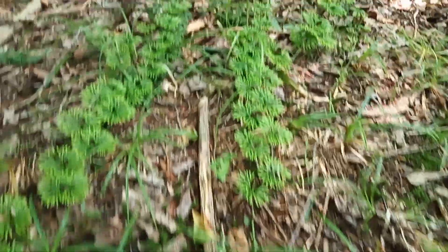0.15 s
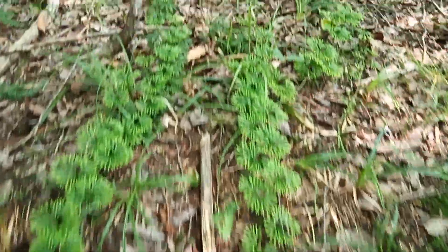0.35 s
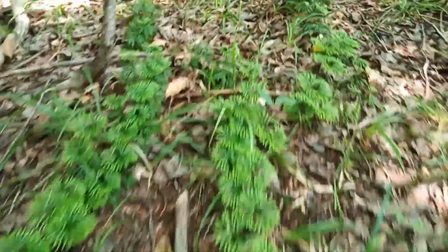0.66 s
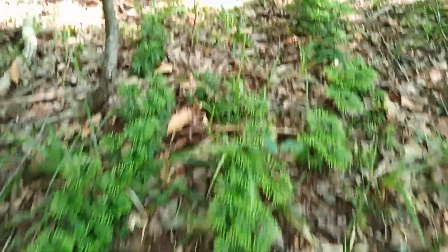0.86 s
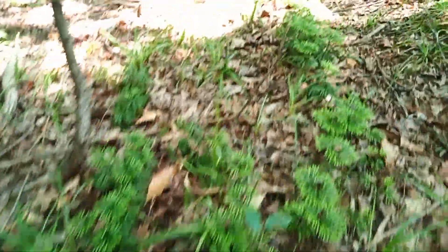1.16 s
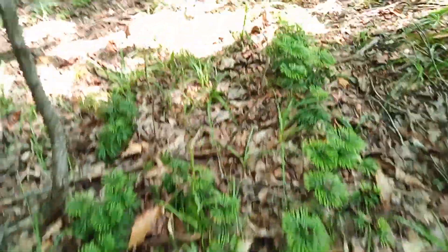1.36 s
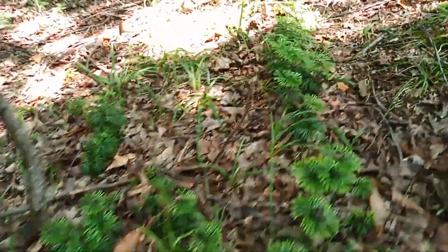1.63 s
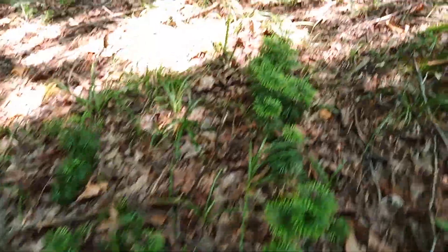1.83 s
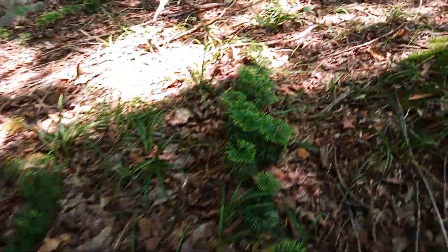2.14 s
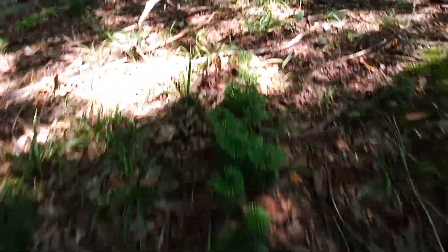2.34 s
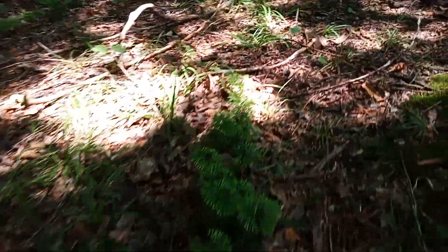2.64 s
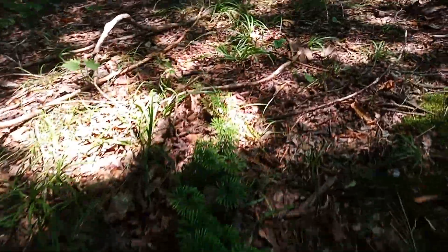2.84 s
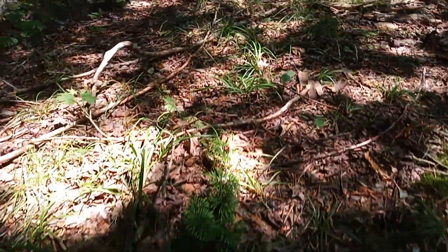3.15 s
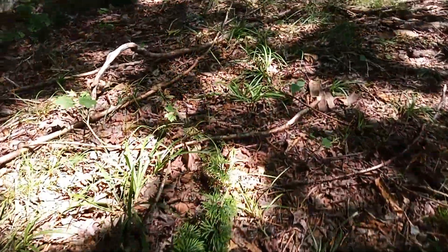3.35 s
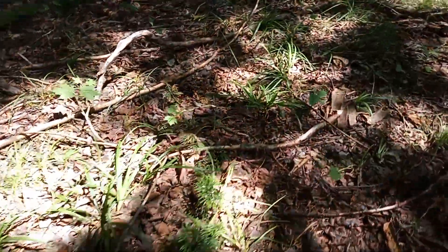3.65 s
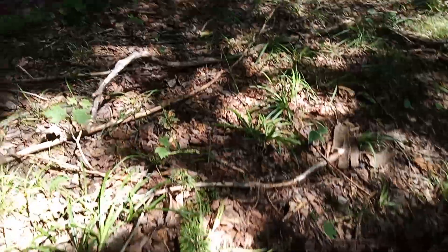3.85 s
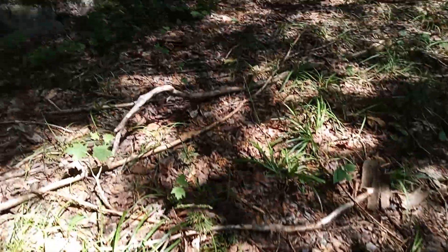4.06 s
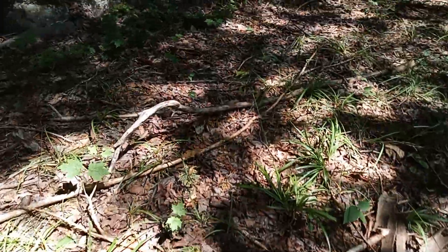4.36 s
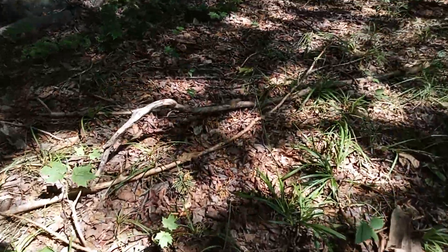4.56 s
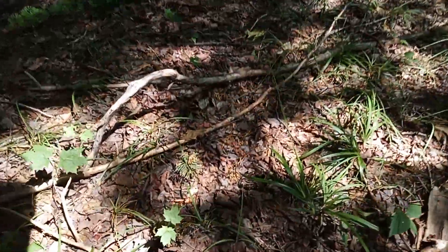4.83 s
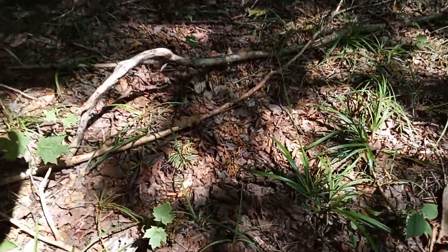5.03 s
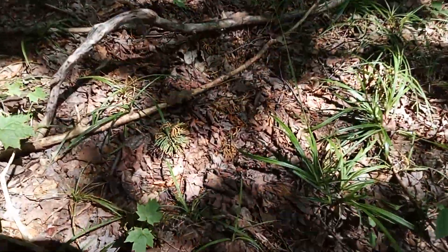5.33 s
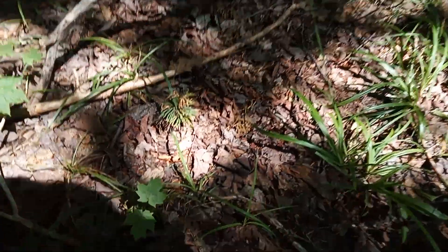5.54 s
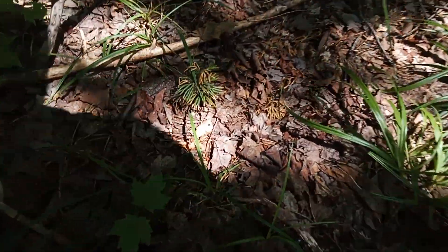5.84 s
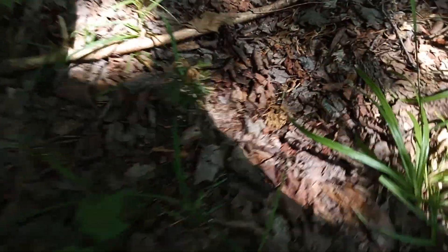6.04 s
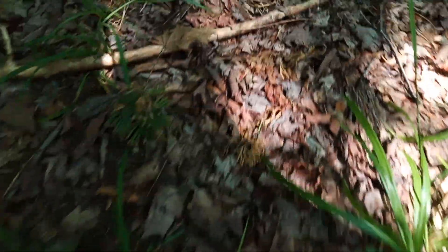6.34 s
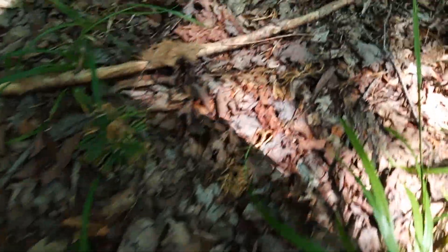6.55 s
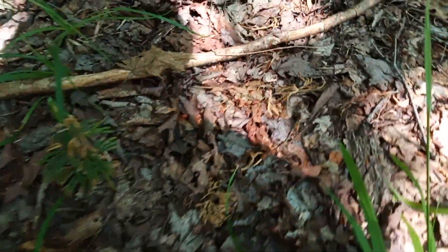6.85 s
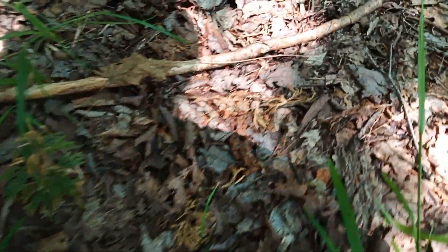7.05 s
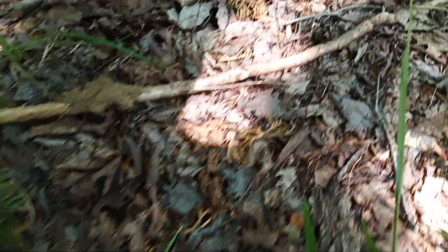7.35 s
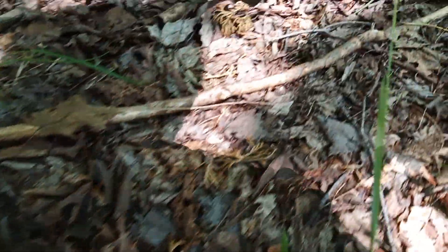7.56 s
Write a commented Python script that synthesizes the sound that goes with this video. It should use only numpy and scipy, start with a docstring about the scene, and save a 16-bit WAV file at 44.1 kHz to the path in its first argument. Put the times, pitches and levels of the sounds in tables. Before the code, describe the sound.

Brittle leaves and twigs crackle underfoot on a quiet forest floor. A brief loud crunch comes early, then near quiet, then a thick run of crisp crunching and bright snaps. Soft low bumps come from the hand gripping the microphone. Later steps are lighter and scattered, with one thin tick, faint high whines and steady muted air.

```python
"""Leaf litter crackles and rustles under slow steps, close to a small hand-held microphone: clumps of tiny
ringing grains over a rubbing hiss, from low twigs to high crumbs, with twigs snapping as noise cracks with rings.
The grip rumbles as filtered noise and thumps the housing in short low sines. Thin high tones whine now and then,
and a faint four-partial hum wavers under still woodland air made of shaped noise."""
import sys
import numpy as np
from scipy import signal
from scipy.fft import rfft, irfft, next_fast_len
from scipy.io import wavfile
from scipy.ndimage import uniform_filter1d, map_coordinates

SR = 44100
rng = np.random.default_rng(int(sys.argv[2]) if len(sys.argv) > 2 else 0)


def generate_wav(sig):
    """Save sig (samples, or channels by samples) to the path in sys.argv[1] as 16-bit PCM at SR."""
    pcm = np.round(np.clip(np.atleast_2d(sig).T, -1, 1) * 32767).astype(np.int16)
    wavfile.write(sys.argv[1], SR, pcm)


N = 339129  # samples

# Presses or drags of the foot: peak t/s, rise/s and fall/s (20 dB each), twigs level/dB, big leaves level/dB,
# big leaves f/Hz, small leaves level/dB, flakes level/dB, crumbs level/dB
PRESSES = [(0.0, .02, 0.052, -69, -51.5, 3920, -52.5, -57.5, -64),
           (0.151, .04, .05, -79, -61.5, 3900, -57.5, -67, -74),
           (0.466, .03, .03, -58.5, -64.5, 2500, -62, -71, -66),
           (0.6, 0.09, 0.095, -92.5, -73, 4600, -75.5, -97, -92),
           (0.698, 0.01, .08, -59.5, -39, 3020, -53, -53, -56.5),
           (0.738, 0.037, .06, -49, -36.5, 3360, -43, -51, -51.5),
           (0.8, .06, .12, -67.5, -55.5, 3000, -57.5, -70, -67.5),
           (0.87, .1, 0.17, -80, -57, 3200, -65.5, -76.5, -78),
           (0.968, 0.017, .15, -86.5, -62, 3500, -88, -84.5, -85),
           (1.04, .2, .04, -84, -61, 3500, -89, -73.5, -84),
           (1.292, .1, 0.071, -75, -67.5, 3430, -70.5, -74, -75.5),
           (1.611, 0.35, .2, -77, -72.5, 2730, -71.5, -78, -83),
           (1.8, .2, 0.27, -84.5, -75.5, 3640, -71, -90, -87.5),
           (2.185, .1, 0.08, -71.5, -59.5, 4260, -57, -69, -64),
           (2.336, 0.073, .13, -59, -46.5, 3940, -46.5, -62.5, -54),
           (2.493, 0.06, .2, -59, -46, 3680, -52, -70.5, -58.5),
           (2.56, .1, .1, -58.5, -55, 4000, -52.5, -69, -62),
           (2.716, .1, 0.14, -64.5, -43, 4350, -43, -54.5, -50),
           (2.823, 0.16, .1, -79, -51.5, 4300, -48, -66, -61),
           (2.907, .05, .05, -70, -45, 4200, -47.5, -55, -53.5),
           (3.06, .15, 0.18, -77, -73, 3930, -62, -77.5, -76.5),
           (3.24, .015, 0.092, -56.5, -42, 4200, -53, -55.5, -58),
           (3.289, 0.055, 0.15, -59.5, -52, 3850, -58, -62, -61),
           (3.52, .2, .4, -79, -57, 4800, -59.5, -65.5, -64.5),
           (3.714, .3, .045, -70, -56, 3700, -57.5, -72, -68.5),
           (3.79, 0.012, .25, -91, -55, 3700, -62, -69.5, -69.5),
           (3.872, 0.12, 0.096, -84, -59, 4260, -65.5, -65.5, -70.5),
           (3.981, 0.063, .03, -78, -55.5, 4500, -57.5, -61, -66.5),
           (4.043, .05, 0.065, -82, -56.5, 3900, -66.5, -63, -69),
           (4.24, .3, 0.24, -79, -66, 4300, -62, -70, -74.5),
           (4.477, .15, 0.33, -71, -59.5, 4200, -63.5, -70.5, -68.5),
           (4.603, 0.22, 0.27, -66, -62.5, 4380, -64.5, -61, -72),
           (4.849, .2, .4, -75.5, -68.5, 4180, -58, -71.5, -73.5),
           (5.014, .3, .25, -75.5, -71.5, 4100, -60.5, -82.5, -75.5),
           (5.375, 0.23, .2, -79.5, -72.5, 3660, -69.5, -78, -77),
           (5.617, .045, 0.054, -64.5, -48.5, 4220, -48.5, -53, -56),
           (5.65, 0.056, .08, -69.5, -58, 3900, -59, -77.5, -70.5),
           (5.75, 0.083, 0.064, -83.5, -65.5, 2700, -67.5, -79, -82),
           (5.819, .08, 0.088, -68, -55, 4700, -55, -75, -83),
           (5.909, .03, 0.065, -70, -58, 2700, -70.5, -76, -80),
           (5.996, .03, 0.072, -85, -72, 4970, -54.5, -77.5, -72),
           (6.102, 0.052, 0.08, -78, -63.5, 4970, -54.5, -67, -73),
           (6.176, 0.037, 0.036, -67, -64, 4190, -73, -81, -69.5),
           (6.401, 0.11, 0.092, -79, -73, 3530, -66.5, -78.5, -77),
           (6.487, 0.046, .04, -66.5, -72.5, 3360, -63, -77.5, -80),
           (6.927, 0.054, .1, -82.5, -73.5, 3570, -70, -76.5, -72),
           (7.037, .04, 0.13, -79, -73.5, 3300, -69, -77.5, -71.5),
           (7.583, .08, .08, -83, -75.5, 4180, -69, -78, -81),
           (7.688, .1, 0.12, -84, -72, 4240, -66, -72, -79)]
# Faint stir between presses: t/s, big leaves level/dB
STIR = [(0, -84.5), (1.1, -83.5), (1.9, -78.5), (3.1, -74), (3.4, -73), (5.1, -74.5), (5.7, -75),
        (6.3, -87), (7, -84.5), (7.3, -79.5), (7.69, -83.5)]
# Stir of twigs, big leaves, small leaves, flakes, crumbs: level/dB relative to the big leaves
STIR_MIX_DB = [-5.5, 0, 4.5, -8, -7]
# Colour of breaking litter through the microphone port: f/Hz, level/dB per Hz
PORT = [(180, -35), (330, -18.5), (480, -14), (923, -19), (1550, -14), (2280, -1), (3770, -6), (4310, -0.5),
        (5460, -6), (7260, 0), (8870, -15), (9980, -6), (13500, -16.5), (15400, -2), (16500, -19.5)]
# Single breaks: t/s, peak level/dB, first ring f/Hz, second ring f/Hz, second ring level/dB relative to the first,
# the crack's dull, crisp and fizzy level/dB, t60/s of the main decay
SNAPS = [(0.176, -54, 4400, 6900, -2, -10, -16, -27, 0.0086),
         (0.234, -50, 4540.0, 2540.0, -9, -23, 6, -21, 0.008),
         (0.3595, -46.5, 12400, 6200.0, 1, 0, -11, -8, 0.011),
         (0.3695, -48, 6770, 4030.0, -15, -11, -15, -25, 0.0057),
         (0.4588, -24, 11600, 2200, -6, -17, -28, -4, 0.0027),
         (0.468, -38, 2040, 14600, -5, -7, -6, -11, 0.0042),
         (0.5299, -30, 6530, 4500.0, -14, -33, -3, -15, 0.0056),
         (0.693, -29.5, 3790.0, 2350.0, 1, -24, -5, -17, 0.0067),
         (0.7168, -27, 4460.0, 2480.0, -5, -12, -3, -17, 0.008),
         (0.7231, -16.5, 2510, 5260, -0.5, -31, 2, -21, 0.017),
         (0.7298, -16.5, 3330, 5580.0, -5, -26, -1, -21, 0.0027),
         (0.7378, -16, 3520, 2000, -18, -26, -7, -32, 0.006),
         (0.7483, -19.5, 6240, 2650.0, -4, -15, 1, -12, 0.004),
         (0.7544, -33, 2500, 4610.0, 0, -15, -6, -20, 0.008),
         (0.7854, -41, 3210.0, 5170.0, -1, -13, -3, -10, 0.008),
         (0.8146, -26.5, 3400, 14730.0, -13, -30, -3, -32, 0.0025),
         (0.8236, -38, 3730.0, 7100, -6, -28, -6, -14, 0.008),
         (0.8375, -39, 7390.0, 4220, 2, -21, -1, -23, 0.008),
         (0.9152, -41, 2370, 4360, -1, -24, -16, -32, 0.008),
         (1.0215, -39, 3280, 2250, -10.5, -30, -24, -17, 0.0083),
         (1.0428, -47, 3600.0, 2520.0, -6, -22, -22, -32, 0.01),
         (1.153, -52.5, 7000, 4760.0, -14, -21, -13, -19, 0.008),
         (1.2698, -51, 7320.0, 15050.0, -8, -23, -15, -18, 0.008),
         (1.2922, -41, 10100, 3290.0, -4.5, -17.5, -6, -13.5, 0.0086),
         (1.3019, -48, 3300, 10080.0, -11, -22, -12, -21, 0.008),
         (1.5703, -51, 2410.0, 4610.0, -6.5, -20.5, -13.5, -25.5, 0.0089),
         (1.606, -43, 6480, 2540.0, -10, -27, -10, -33, 0.0095),
         (1.7464, -49, 5940.0, 3980, -21, -24, -11.5, -23, 0.008),
         (2.1462, -30, 7290, 3920.0, -14, -29, -27, -29, 0.0047),
         (2.1532, -37.5, 6480.0, 4110.0, -15, -29, -22, -30, 0.008),
         (2.1829, -38.5, 15600, 4700, -1, -18, -10, -11, 0.008),
         (2.2685, -49, 7300, 4030.0, -4, -26, -6, -18, 0.0092),
         (2.3036, -42, 4610.0, 15500.0, -1, -21, 0, -7, 0.008),
         (2.3134, -31, 7200, 4290.0, -9, -21, -6, -9, 0.008),
         (2.3277, -35, 6800.0, 4600, -6, -25, -4, -11, 0.008),
         (2.336, -27.5, 7300, 15500, -1, -18, -10, -8, 0.008),
         (2.3481, -33, 7140, 2970.0, -10, -19, -5, -18, 0.0069),
         (2.3535, -36, 7340.0, 4930.0, -6, -11, -6, -17, 0.008),
         (2.387, -31, 4150, 2970, -7, -26, -6, -19, 0.008),
         (2.4205, -34.5, 7320.0, 3750.0, -4, -20, -3, -14, 0.008),
         (2.4716, -26, 6720.0, 2650.0, -17, -17, -5, -19, 0.008),
         (2.4805, -35.5, 2070, 3470.0, -5, -9, -4, -14, 0.008),
         (2.4906, -37, 15200.0, 4970.0, 0, -3, -5, -14, 0.008),
         (2.5032, -30, 4250, 7300, -3, -18, 2, -14, 0.008),
         (2.5101, -29, 4200, 15090.0, -6, -19, 6, -23, 0.008),
         (2.5255, -31, 3320.0, 7080.0, 3, -9, 7, -17, 0.008),
         (2.5378, -37, 4390.0, 2390.0, -3, -1, -2, -17, 0.008),
         (2.5531, -37, 4310.0, 7260.0, -2, -20, 3, -17, 0.008),
         (2.5627, -38, 4330, 6240.0, -2, -23, -7, -24, 0.0086),
         (2.5851, -36, 15120.0, 5400, -1, -15, -4, -10, 0.008),
         (2.593, -27, 7530, 4550, -3, -28, 6.5, -14.5, 0.0059),
         (2.617, -20, 7110.0, 4870.0, -5, -27, 9.5, -5.5, 0.0089),
         (2.6234, -35, 6070.0, 2970.0, -6, -22, -5, -8, 0.008),
         (2.6465, -39, 6550.0, 2410, -4, -19, 0, -22, 0.008),
         (2.6677, -33, 4350.0, 15460.0, 0, -24, -7, -15, 0.008),
         (2.6806, -32, 5750.0, 3960.0, -3, -21, 0, -10, 0.009),
         (2.6861, -27.5, 4560, 6840, -9, -27, -7, -16, 0.0094),
         (2.7006, -31, 4780.0, 7060.0, -5, -21, 1, -16, 0.0066),
         (2.7077, -21, 4350.0, 15200, -6, -45, -1, -9, 0.008),
         (2.7129, -29, 6370.0, 4000, -12, -35, -15, -19, 0.0063),
         (2.7245, -29, 7240.0, 4370.0, 0, -25, 0, -15, 0.0068),
         (2.7328, -27.5, 6570.0, 9450, -2, -34, -3, -11, 0.008),
         (2.7476, -35, 6200.0, 4030.0, -6, -23, -2, -19, 0.0058),
         (2.7696, -32, 7150.0, 14710.0, -1, -18, -2, -2, 0.008),
         (2.7975, -30.5, 4230, 7640, -1, -34, -2, -11, 0.0089),
         (2.8058, -32, 7200, 4260.0, -2, -45, -12, -23, 0.0072),
         (2.8149, -25.5, 6460, 4200, -4, -47, -27, -33, 0.008),
         (2.8273, -30, 4650, 6850.0, 0, -34, 1, -28, 0.0062),
         (2.8353, -39, 4110.0, 6270.0, -1, -30, -7, -23, 0.008),
         (2.8978, -13, 7030, 15240, -3.5, -49, -1, -9, 0.011),
         (2.9127, -30, 4720.0, 6700.0, -2, -27, 4, -17, 0.0072),
         (2.9825, -46, 7100, 4480.0, -11, -24, -16, -26, 0.008),
         (2.9931, -39.5, 6450, 4460.0, -19, -37, -27, -35, 0.0047),
         (3.2194, -38.5, 2610.0, 10850.0, 7, -27, 2, -4, 0.0099),
         (3.2323, -25, 5000, 2710.0, -6.5, -28, 3, -42, 0.023),
         (3.2424, -28, 4840, 2820, -11, -28, -8, -14, 0.008),
         (3.2519, -30.5, 3970, 6270.0, -5, -0.5, -30, -24, 0.0097),
         (3.2595, -38, 4050.0, 7240.0, 0, -17, -2, -11, 0.008),
         (3.2666, -38, 15610.0, 6180.0, -3, -22, -5, -14, 0.008),
         (3.3335, -47, 5430.0, 3570.0, -6, -18, 1, -11, 0.008),
         (3.3718, -43, 7110.0, 2880, -9, -25, -10, -14, 0.008),
         (3.5166, -46, 5100, 10550.0, -4, -22, -8, -21, 0.007),
         (3.5263, -45, 10600, 14990.0, -5, -25, -15, -20, 0.0086),
         (3.5873, -43, 7050, 4030.0, -6, -21, 2, -21, 0.008),
         (3.651, -36.5, 6260, 4050.0, -14, -27, -9, -27, 0.008),
         (3.6652, -40.5, 6800.0, 15070.0, -8, -28, -4, -16, 0.0043),
         (3.7017, -39, 6220.0, 3620.0, 5, -19, -11, -15, 0.008),
         (3.8266, -54, 7060.0, 4110.0, -5, -19, -3, -20, 0.008),
         (3.8388, -36.5, 10900, 4650.0, -12, -36, -10, -30, 0.012),
         (3.858, -47, 4650.0, 6700, 0, -29, -6, -21, 0.008),
         (3.8729, -42, 4540.0, 2730.0, -8, -18, 1, -21, 0.0092),
         (3.9576, -34.5, 7280.0, 3850.0, -24, -28, -21, -33, 0.0068),
         (3.9743, -34, 5230.0, 11200, -3, -24, 0, -20, 0.0094),
         (3.9918, -32, 10920, 4550, -2, -42, 4, -10, 0.008),
         (4.0291, -38, 3940.0, 5700, -2, -27, -3, -5, 0.008),
         (4.0474, -40.5, 2700, 5400.0, -4, -25, -1, -15, 0.008),
         (4.0735, -48, 15500.0, 7560.0, 1, -12, -10, -13, 0.008),
         (4.1368, -48, 6800, 4160.0, -7, -15, -10, -14, 0.008),
         (4.1564, -39, 4740, 7120, -6, -24, 11, -14, 0.013),
         (4.206, -43.5, 7200, 4110.0, -16, -30, -13.5, -27, 0.007),
         (4.2307, -46, 7300, 4030.0, -17, -29, -20, -27, 0.0065),
         (4.2599, -32, 7300, 10300, -20, -34, -31, -35, 0.0036),
         (4.4641, -35, 9690.0, 4140, -13, -22, -12, -7, 0.008),
         (4.4723, -39, 1920, 15500, -11, -12, -14, -28, 0.011),
         (4.4897, -32.5, 4590.0, 7300.0, -2, -20, -10, -7, 0.0071),
         (4.5097, -36.5, 9540, 3980.0, -4, -25, -5, -13, 0.012),
         (4.5835, -43, 8180.0, 2150.0, -8, -15, -7, -21, 0.0069),
         (4.5993, -40, 10250.0, 5150.0, -3, -19, -11, -20, 0.0073),
         (4.6136, -44, 10830.0, 4240.0, -6, -15, -10, -18, 0.008),
         (4.6646, -46, 4410.0, 7000, -3, -11, 0, -24, 0.0074),
         (4.7149, -50, 6850.0, 10510.0, -5, -2, -8, -15, 0.008),
         (4.8402, -40, 7260, 4160.0, -16, -30, -16, -26, 0.0052),
         (4.846, -45, 7240.0, 4500.0, -13, -24, -8, -26, 0.0067),
         (4.8799, -49, 6570.0, 15550.0, -17, -28, -16, -30, 0.0073),
         (4.9317, -42, 7300, 5040.0, -11, -26, -18, -15, 0.0099),
         (5.0209, -46, 6800, 4100, -13, -23, -14, -30, 0.0065),
         (5.3756, -47, 2230, 6720.0, -1, -1, -2, -8, 0.0073),
         (5.567, -49.5, 400, 740, -15, -13, -34, -34, 0.037),
         (5.6056, -33, 7540, 14880.0, -1, -32, -14, -7, 0.008),
         (5.6133, -35, 15460.0, 7240.0, -6, -24, -5, -10, 0.008),
         (5.6313, -31, 6030, 8590.0, 1, -16, 4, -22, 0.0078),
         (5.714, -45, 6700, 4110.0, -15, -35, -17, -20, 0.0052),
         (5.7639, -45, 2670.0, 6290.0, -9, -31, -11, -20, 0.008),
         (5.7899, -35, 5900, 4220, -9, -33, -3, -38, 0.0057),
         (5.8015, -42, 5900, 4090.0, -7, -21, -3, -32, 0.008),
         (5.8203, -36, 4310, 7700, -11, -40, 5, -29, 0.008),
         (5.9022, -35.5, 1240, 2710.0, -2, -5, 3, -11, 0.008),
         (5.9086, -44.5, 2550, 1380.0, 0, -3, -3, -31, 0.008),
         (5.9475, -48, 2500.0, 6400.0, -4, -17, -14, -10, 0.008),
         (5.9962, -40, 7100, 4310.0, -15, -34, -20, -17, 0.0063),
         (6.0687, -20.5, 15120.0, 9990.0, -1.5, -49, -33, -10, 0.0046),
         (6.1057, -41, 6040, 9150.0, -11, -35, -14, -30, 0.0085),
         (6.138, -51, 6550.0, 2950.0, -2, -12, -3, -23, 0.0077),
         (6.1657, -36, 1390, 4280, -1.5, -5, -14, -11, 0.011),
         (6.1793, -46, 4500, 1460.0, -12, -7, -15, -24, 0.008),
         (6.2409, -32.5, 2620, 6090.0, 1, -2, 2, -14, 0.0052),
         (6.2682, -48, 10270.0, 7240.0, -5.5, -23, -5, -21, 0.008),
         (6.3857, -49, 6870, 2380, -8, -12.5, -3, -28, 0.0073),
         (6.4114, -48, 2290, 6330.0, -6, -8, -7, -22, 0.0067),
         (6.4732, -49, 6550, 15270.0, -15, -16, -15, -21, 0.008),
         (6.4812, -32.5, 2370, 1090, -15, -4, -8, -19, 0.008),
         (6.4893, -47, 1320, 1870.0, -6, -5, -17, -32, 0.0092),
         (6.5025, -47, 6930, 4760, -8, -19.5, -15, -29, 0.008),
         (6.9246, -46, 6430, 15630, -6.5, -26, -17, -18, 0.008),
         (6.931, -47, 6400.0, 15610.0, -7, -20, -18, -19, 0.008),
         (7.0266, -46, 6600, 15400.0, -10, -25, -20.5, -21, 0.015),
         (7.033, -43, 6900, 10900, -13, -27, -19, -22, 0.008),
         (7.0392, -43.5, 10700, 6870, -3, -26, -14, -22, 0.01),
         (7.3423, -54, 7020.0, 4080, -1.5, -22, -0.5, -23, 0.0074),
         (7.5797, -48.5, 7200, 4570.0, -4, -18, -1.5, -17, 0.008),
         (7.6499, -50, 7040.0, 10140, -10, -20, -13, -21, 0.008)]
# Where a crack is dull, crisp, fizzy: f/Hz
CRACK_HZ = [1000, 4700, 13000]
# Lesser breaks: median peak over the litter's gain and its spread, crack colour at CRACK_HZ, main decay
LESSER_DB, LESSER_SPREAD_DB, LESSER_CRACK_DB, LESSER_T60_S = 5, 2.5, [-22, -7, -16.5], 0.0073
CROWDING = 0.35  # power of the litter's gain that draws lesser breaks into loud presses
# Colour of the grip rumble through the housing: f/Hz, level/dB per Hz
HOUSING = [(15, -45.5), (25, -35), (54, 8.5), (98, 10.5), (123, 6), (194, -9), (300, -30), (390, -38),
           (660, -120)]
# The hand shifts on the housing: peak t/s, rise/s and fall/s (20 dB each), rumble level/dB
SHIFTS = [(0.0, .1, 0.39, -71), (0.26, 0.075, 0.25, -69), (0.54, 0.044, .09, -66), (0.83, .04, .06, -58),
          (1.03, 0.11, .03, -66), (1.14, 0.057, .25, -72.5), (1.62, 0.07, .1, -57.5), (1.95, .05, .2, -67),
          (2.122, 0.05, .03, -48.5), (2.23, 0.03, 0.28, -58), (2.36, 0.043, 0.14, -41.5),
          (2.57, 0.053, .06, -45.5), (2.76, 0.045, .2, -63), (2.89, 0.083, 0.092, -56),
          (2.99, 0.12, 0.12, -56.5), (3.44, 0.099, 0.34, -62.5), (3.62, 0.087, 0.14, -49),
          (3.83, 0.019, 0.46, -54.5), (4.03, 0.13, 0.11, -56), (4.45, .04, 0.17, -63.5),
          (5.18, .08, .2, -68), (5.55, 0.086, .8, -73), (6.06, 0.54, 0.15, -72), (6.17, 0.16, 0.042, -71.5),
          (7.129, 0.17, .2, -73.5)]
HOLD_DB = -91  # rumble of the steady hold
# Housing knocks: t/s, level/dB before the soft attack, f/Hz, t60/s
THUMPS = [(2.096, -49, 53.8, 0.095), (2.341, -53, 96, 0.114), (2.523, -53, 118, 0.066),
          (2.9, -27.5, 120, 0.052), (2.988, -26.5, 113, 0.04), (3.474, -41.5, 74.4, 0.096),
          (3.592, -45, 77, 0.29), (3.819, -46, 68, 0.37)]
# Thin high whines: t/s, length/s, f/Hz, level/dB, level/dB of the tone a fifth up (levels before the flicker)
WHINES = [(5.123, 0.32, 7530, -69, -99), (7.08, 0.27, 7270, -76, -85.5), (7.33, 0.19, 7090, -75, -80)]
HUM_HZ = 117.6  # centre of the fundamental's wander
# Hum fundamental before the waver: t/s, level/dB
HUM = [(0.0, -85), (0.3, -64), (0.45, -82), (0.86, -66), (0.92, -76), (1.61, -69.5), (1.69, -87),
       (2.27, -63), (2.31, -70), (2.4, -54), (2.63, -61), (3.0, -58), (3.04, -69), (3.41, -72.5),
       (3.64, -64), (3.79, -85), (4.07, -67), (4.11, -75.5), (4.77, -73.5), (6.17, -72.5), (6.34, -86),
       (7.5, -84.5), (7.56, -71.5), (7.69, -77)]
# Hum partials 2, 3, 4 between swells, before the waver: level/dB
PARTIALS_DB = [-90, -87.5, -92]
# A hum partial swells: peak t/s, rise/s and fall/s (20 dB each), partial number, level/dB
PARTIAL_SWELLS = [(1.58, 0.21, 0.085, 3, -79.5), (1.71, .2, .35, 2, -74), (3.72, 0.045, 0.038, 3, -67),
                  (3.88, 0.11, 0.18, 3, -63), (3.9, 0.64, 0.18, 2, -74), (4.33, 0.21, 0.19, 3, -67),
                  (4.35, 0.37, 0.52, 2, -75.5), (4.99, 0.19, 0.36, 3, -81.5), (5.59, 0.19, .3, 3, -82),
                  (6.15, .6, .3, 2, -81)]
# Colour of the background air: f/Hz, level/dB per Hz
AIR = [(18, -32), (30, -17), (135, 9), (350, -4), (409, -8), (467, -7.5), (519, -15), (1270, -19),
       (5590, -15.5), (7090, -11.5), (8760, -43), (10500, -16.5), (13400, -46.5), (15200, -18.5),
       (16500, -39.5)]
AIR_DB = -70  # mean level of the air
TOP_HZ = 15950  # band limit


def rustle():
    """Dense small breaks over a rubbing hiss; the smaller the piece, the higher its grains."""
    (twig, leaf, little, flake, crumb), leaf_hz = litter()

    def near(hz):
        return hz * 2 ** (0.099 * wobble(20))

    twigs = 0.61 * grains(near(752), 0.31, count=3500, cycles=11, spread_db=2.0)
    twigs = twigs + 0.77 * rub(570, 2000)
    leaves = 0.53 * grains(leaf_hz, 0.25, count=6000, cycles=16, spread_db=2.5)
    leaves = leaves + 0.56 * rub(2900, 5500)
    small = 0.77 * grains(near(6980), 0.15, count=8000, cycles=16, spread_db=2.5)
    small = small + 0.48 * rub(5500, 8200)
    flakes = 0.71 * grains(near(10500), 0.1, count=8000, cycles=30, spread_db=4.0)
    flakes = flakes + 0.96 * rub(9000, 17000)
    crumbs = 0.8 * grains(near(14600), 0.06, count=8000, cycles=30, spread_db=2.5)
    crumbs = crumbs + 0.7 * rub(12500, 17000)
    layers = twig * twigs + leaf * leaves + little * small + flake * flakes + crumb * crumbs
    return amp(2.2 * wobble(45)) * layers  # the whole rustle flutters


def litter():
    """Gains of twigs, big leaves, small leaves, flakes, crumbs, and the big leaves' pitch: presses over the stir."""
    power = amp(curves(STIR)[0] + np.array(STIR_MIX_DB)[:, None]) ** 2
    for s, rise, fall, twig_db, leaf_db, _, *fine_db in PRESSES:
        press = np.outer(amp([twig_db, leaf_db, *fine_db]), swell(s, rise, fall))
        power = power + press ** 2
    leaf_hz = curves([(row[0], row[5]) for row in PRESSES])[0]
    return np.sqrt(power), leaf_hz


def grains(centre_hz, octaves, count, cycles, spread_db):
    """Tiny breaks in clumps, sizes uneven: each decays 60 dB in the given cycles, cut after about ten."""
    at, size = rng.random((count, 2)).T
    crowd = np.cumsum(amp(4.5 * wobble(60)))
    start = np.interp(at, crowd / crowd[-1], np.arange(N)).astype(int)
    hz = np.clip(centre_hz[start] * 2 ** (octaves * rng.standard_normal(count)), 300, 15900)
    # a few draws near zero make rare large breaks
    gain = amp(along(PORT, hz) - spread_db * np.log(size + 0.006)) * np.sqrt(hz)
    k = np.arange(int(10 * SR / np.median(hz)))
    turns = np.outer(hz / SR, k)
    envelope = np.exp(-np.log(1000) * turns / cycles) * (1 - np.exp(-turns))
    rings = gain[:, None] * envelope * np.sin(2 * np.pi * turns)
    landing = (start[:, None] + k).ravel()
    return unit(np.bincount(landing, rings.ravel(), minlength=N)[:N])


def rub(lo_hz, hi_hz):
    """The hiss of pieces sliding over each other: band-shaped noise in patches of shifting colour."""
    z = signal.stft(rng.standard_normal(N), nperseg=256)[2]
    patches = uniform_filter1d(rng.standard_normal(z.shape), size=4, axis=0)  # across frequency
    patches = uniform_filter1d(patches, size=8, axis=1)  # across time
    hiss = signal.istft(z * amp(3 * unit(patches)), nperseg=256)[1][:N]

    def band(hz):
        low_cut = 1 + (lo_hz / (hz + 1)) ** 10
        high_cut = 1 + (hz / hi_hz) ** 10
        return amp(along(PORT, hz)) / np.sqrt(low_cut * high_cut)

    return unit(filtered(hiss, band))


def snaps():
    """Each break: a sharp noise crack, two brief rings of the piece, then a weak rattle as it settles."""
    size, rows = 2048, [*SNAPS, *lesser_snaps(count=70)]
    out, t, hz = np.zeros(N + size), np.arange(size) / SR, np.fft.rfftfreq(size, 1 / SR)
    port_level = along(PORT, np.array(CRACK_HZ))
    attack = 1 - np.exp(-t / 0.00033)
    low_cut = np.sqrt(1 + (550 / (hz + 1)) ** 4)
    noises = rng.standard_normal((len(rows), size))
    for (s, db, hz1, hz2, db2, *tone, t60), noise in zip(rows, noises):
        # bend the port's colour to meet the dull, crisp and fizzy levels
        bend = along(list(zip(CRACK_HZ, tone - port_level)), hz)
        colour = amp(along(PORT, hz) + bend) / low_cut
        crack = 1.67 * irfft(rfft(noise) * colour)
        ring = np.sin(2 * np.pi * hz1 * t) + amp(db2) * np.sin(2 * np.pi * hz2 * t)
        decay = amp(-60 * t / t60) + 0.131 * amp(-60 * t / 0.033)  # main break, then rattle
        burst = attack * (crack + ring) * decay
        out[round(s * SR):][:size] += amp(db) * burst / np.abs(burst).max()
    return out[:N]


def lesser_snaps(count):
    """Rows of small breaks at random, crowding where the litter is pressed hardest."""
    gain = np.linalg.norm(litter()[0], axis=0)
    crowd, r = np.cumsum(gain ** CROWDING), rng.standard_normal((count, 8))
    at = np.searchsorted(crowd / crowd[-1], rng.random(count))
    peak_db = 20 * np.log10(gain[at]) + LESSER_DB + LESSER_SPREAD_DB * r[:, 0]
    hz1 = 3900 * 2 ** (0.3 * r[:, 1])
    hz2 = 6900 * 2 ** (0.069 * r[:, 2])
    db2 = 4 + 6 * r[:, 3]
    crack_db = LESSER_CRACK_DB + 5 * r[:, 4:7]
    return np.column_stack([at / SR, peak_db, hz1, hz2, db2, crack_db, np.full(count, LESSER_T60_S)])


def handling():
    """The grip rumbles in lumps of low noise and knocks the housing into short, decaying low sines."""
    rumble = filtered(rng.standard_normal(N), lambda hz: amp(along(HOUSING, hz)))
    lumps = amp(3.1 * wobble(14)) * rumble
    grip = amp(HOLD_DB) + sum(amp(db) * swell(s, rise, fall) for s, rise, fall, db in SHIFTS)
    out, t = grip * unit(lumps), np.arange(SR // 4) / SR
    attack = 1 - np.exp(-t / 0.01)
    for s, db, hz, t60 in THUMPS:
        knock = amp(db - 60 * t / t60) * attack * np.sin(2 * np.pi * hz * t)
        out[round(s * SR):][:len(t)] += knock
    return out


def whines():
    """Thin high tones, unsteady in pitch and level, that fade in and out with a tone a fifth above."""
    out, t = 0, np.arange(N) / SR
    for s, length, hz, db, upper_db in WHINES:
        turn = 2 * np.pi * np.cumsum(hz * (1 + 0.0063 * wobble(90))) / SR
        fade = np.sin(np.pi * np.clip((t - s) / length, 0, 1)) ** 0.51
        shape = fade * amp(4.5 * wobble(35))
        tones = amp(db) * np.sin(turn) + amp(upper_db) * np.sin(3 / 2 * turn)
        out = out + np.sqrt(2) * shape * tones  # root two: levels are rms
    return out


def hum():
    """Four partials of a low tone that drift together in pitch and waver separately in strength."""
    turn = 2 * np.pi * np.cumsum(HUM_HZ + 1.57 * wobble(8.3)) / SR
    gains = [amp(curves(HUM)[0])]
    for partial, rest_db in enumerate(PARTIALS_DB, start=2):
        swells = sum(amp(db) * swell(s, rise, fall)
                     for s, rise, fall, n, db in PARTIAL_SWELLS if n == partial)
        gains.append(amp(rest_db) + swells)
    return sum(np.sqrt(2) * gain * amp(3.6 * wobble(22)) * np.sin(partial * turn)
               for partial, gain in enumerate(gains, start=1))


def air():
    """Far leaves and the microphone's own hiss, as one bed of shaped noise that barely drifts in level."""
    bed = filtered(rng.standard_normal(N), lambda hz: amp(along(AIR, hz)))
    return amp(AIR_DB + 0.4 * wobble(1.3)) * unit(bed)


def swell(s, rise, fall):
    """Gain that climbs to 1 at s and dies away, 20 dB in each given time."""
    t = np.arange(N) / SR - s
    return amp(-20 * np.maximum(-t / rise, t / fall))


def wobble(rate):
    """A smooth random curve, rate knots a second."""
    knots = rng.standard_normal(int(N * rate / SR) + 4)
    return map_coordinates(knots, [np.arange(N) * rate / SR])


def curves(rows):
    """One value per sample for each column after the time."""
    s, *cols = np.transpose(rows)
    return [np.interp(np.arange(N) / SR, s, c) for c in cols]


def along(points, hz):
    """Values at hz, read between (Hz, value) points on a log axis."""
    f, v = np.transpose(points)
    return np.interp(np.log(hz + 1), np.log(f + 1), v)


def filtered(x, response):
    """x with its spectrum multiplied by a response of frequency."""
    m = next_fast_len(N + 8192)
    return irfft(rfft(x, m) * response(np.fft.rfftfreq(m, 1 / SR)), m)[..., :N]


def amp(db):
    """Decibels to gain."""
    return 10 ** (np.asarray(db) / 20)


def unit(x):
    """Scaled to rms 1."""
    return x / np.sqrt(np.mean(x ** 2) + 1e-20)


def scene():
    """All sources, one channel."""
    return (rustle() + snaps() + handling() + hum() + whines() + air())[None]


def record(dry):
    """Nothing is kept above the band limit."""
    return filtered(dry, lambda hz: hz < TOP_HZ)


dry = scene()
out = record(dry)
generate_wav(out)
```